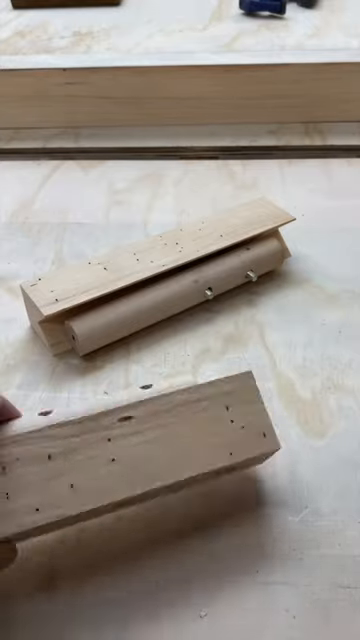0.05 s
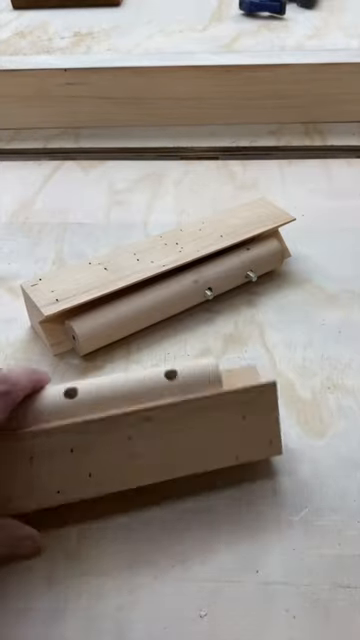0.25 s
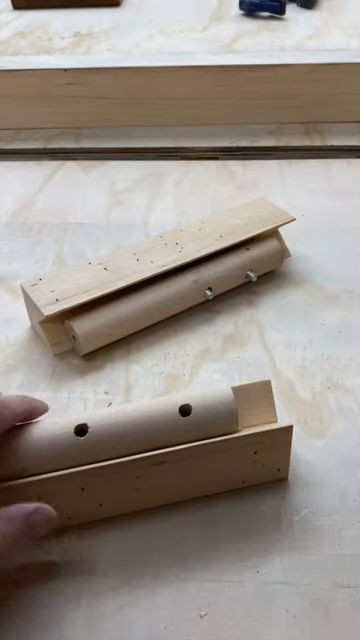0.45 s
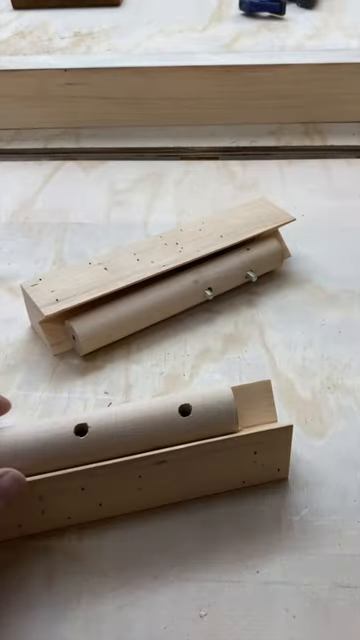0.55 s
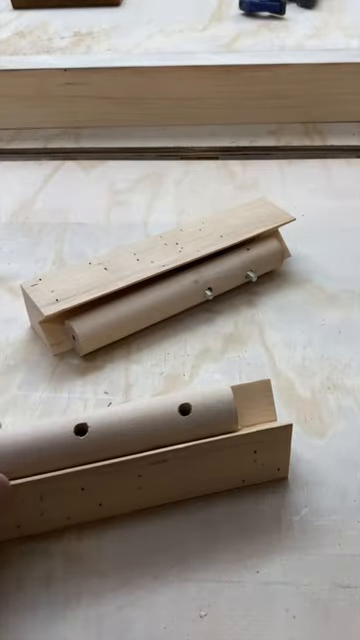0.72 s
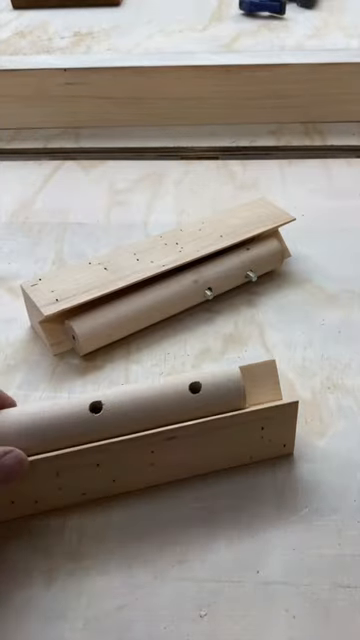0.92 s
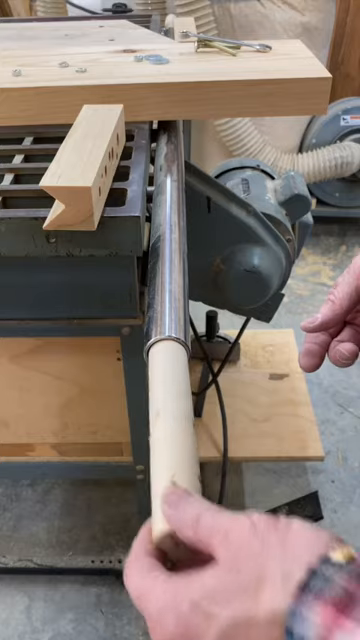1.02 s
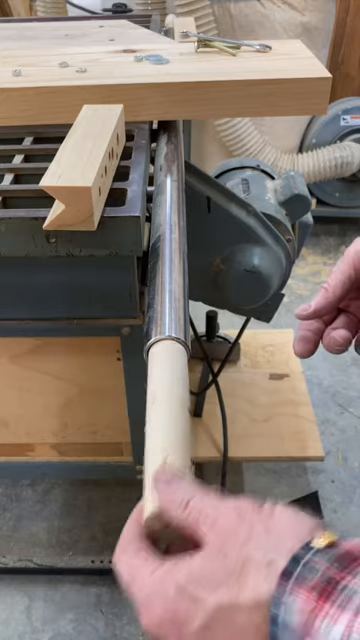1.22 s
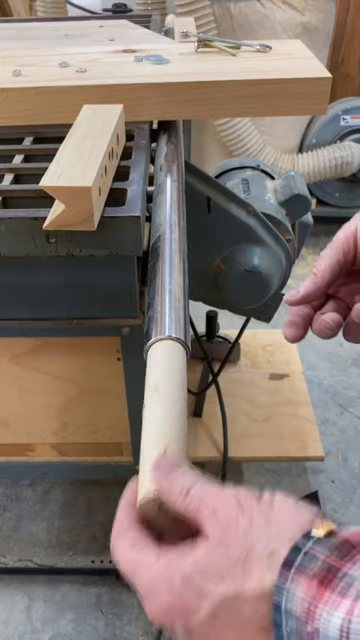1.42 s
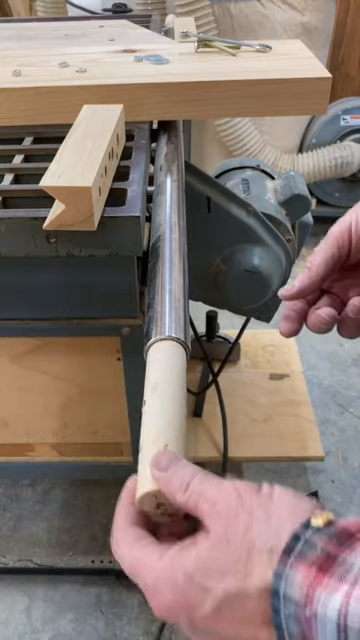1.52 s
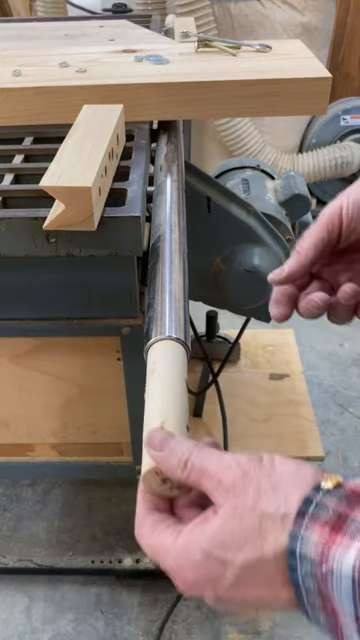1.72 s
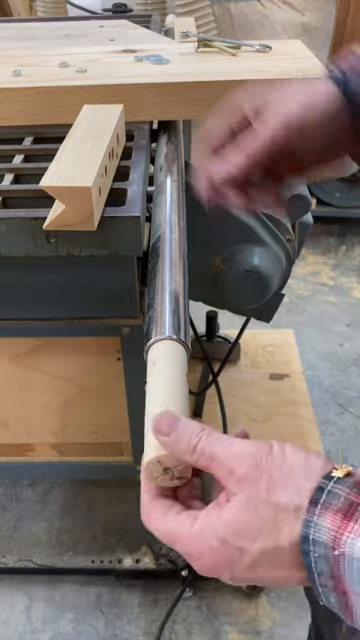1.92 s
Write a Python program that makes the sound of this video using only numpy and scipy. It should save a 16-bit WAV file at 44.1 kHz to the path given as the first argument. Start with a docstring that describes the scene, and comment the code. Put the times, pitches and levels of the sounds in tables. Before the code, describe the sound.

A wooden block clacks onto a workbench, then a dowel scrapes and taps into a tube.

```python
"""A small workshop, heard up close. Fingers brush a wooden block holding a dowel; it touches the
workbench, drops flat with a loud clack and is nudged along, shaking the bench. Then a dowel scrapes
into a steel tube on a machine stand, taps its wall and slides in. Each hit rings the wood or steel
and thumps the frame below; each rub is a stream of tiny slips over hiss, plus resonances kept
singing by friction. A short reverb and a quiet room tone sit behind it all."""
import sys
import numpy as np
from scipy import signal
from scipy.fft import rfft, irfft
from scipy.io import wavfile
from scipy.ndimage import uniform_filter1d, minimum_filter1d

SR = 44100
rng = np.random.default_rng(int(sys.argv[2]) if len(sys.argv) > 2 else 0)


def put_to_file(sound):
    """Save the sound as 16-bit audio at rate SR, in the file named by the first command-line argument."""
    columns = np.atleast_2d(sound).T  # one column per channel
    safe = np.clip(columns, -1, 1)
    whole_steps = np.round(safe * 32767)
    wavfile.write(sys.argv[1], SR, whole_steps.astype(np.int16))


N = 85995
T = np.arange(N) / SR
HZ = np.fft.rfftfreq(2 * N, 1 / SR)

# room tone EQ: f/Hz, level/dB
ROOM_TONE_EQ = [(30, -12.5), (70, 1), (130, -16), (300, -12.5), (1500, -23), (4500, -26), (6200, -23),
                (10500, -30.5), (13500, -65)]
# fingers and wood brushing the bench: t/s, length/s, level/dB, attack/s, release/s
STROKES = [(0.032, 0.0043, -56.5, 0.0011, 0.0041), (0.1, 0.16, -62, 0.037, 0.082),
           (0.219, 0.13, -48.5, 0.078, 0.052), (0.547, 0.19, -58.5, 0.019, 0.14),
           (0.718, 0.37, -59.5, 0.15, 0.13), (1.552, 0.064, -68, .015, 0.04)]
# brushing EQ: f/Hz, level/dB
BRUSH_EQ = [(100, -4.5), (500, -6.5), (1500, -17.5), (3000, -2.5), (4700, -10.5), (5900, -4.5), (8000, -3),
            (11000, -5.5), (14000, -59.5)]
# modes of the rubbed block: f/Hz, level/dB, t60/s
WOOD_RUB_MODES = [(2890, -2, 0.036), (4150, -6, 0.036), (5760, 4, 0.014), (7100, 0, 0.015),
                  (8500, -2, 0.007)]

# block hitting the bench: t/s, level/dB, low-pass/Hz, bench thump level/dB
KNOCKS = [(.2068, -13, 920, -41.5), (.3055, -12, 900, -45), (.3228, -20, 3020, -56.5),
          (.3257, 0, 2103, -26.5), (.3296, -10.5, 950, -36), (.3345, -16, 9920, -41.5),
          (.3372, -12.5, 6000, -35), (.3412, -9.5, 850, -29.5), (.3525, -18.5, 3800, -37.5),
          (.419, -24, 960, -55)]
# modes of block and bench top: f/Hz, level/dB, t60/s
WOOD_MODES = [(142.2, -8.5, 0.5), (197.7, -12.5, 0.46), (264.8, -11.5, 0.3), (333, 4, 0.2), (423, -10, .25),
              (516, -11, 0.2), (599, 0.5, 0.22), (708, -6.5, 0.19), (895, -12.5, 0.3), (937.4, -8.5, .2),
              (1558, -18.5, 0.3), (2380, -24, .25), (2550, -22, 0.11), (2875, -6.5, 0.22)]
# EQ of the wood's snap and dense ringing: f/Hz, level/dB
WOOD_EQ = [(50, -24), (150, -8.5), (350, -6), (700, -1.5), (1200, -10), (2500, -9.5), (3600, -7.5),
           (4700, -13.5), (6000, -11.5), (8500, -16.5), (11000, -22), (15000, -39.5)]
# decay of that ringing: f/Hz, t60/s
WOOD_DECAY = [(150, 0.34), (700, 0.12), (2500, 0.11), (6000, .04), (12000, 0.02)]
# modes of the bench frame: f/Hz, level/dB, t60/s
BENCH_MODES = [(54, -11, 0.83), (63, 8, 0.093), (92.8, -3, 1.3), (156.4, -4, 0.3)]
# bench shaken by the nudged block: t/s, level/dB
JUDDER_FADER = [(.5, -52), (.65, -46), (.75, -47), (.92, -60.5)]

# dowel dragging on the rim: t/s, level/dB
SCRAPE_FADER = [(.75, -58.5), (.82, -49), (.93, -49), (.975, -39), (1.008, -37.5), (1.045, -47.5),
                (1.1, -77), (1.2, -76), (1.25, -44.5), (1.42, -59), (1.54, -58.5), (1.66, -63),
                (1.78, -49.5), (1.88, -69)]
# scrape EQ: f/Hz, level/dB
SCRAPE_EQ = [(50, -15.5), (200, 3), (400, 1.5), (650, -4.5), (1100, -10), (2000, -16.5), (2800, -21),
             (4000, -31), (10000, -46.5), (13500, -82.5)]
# rim set ringing by the drag: t/s, level/dB
RIM_FADER = [(.9, -65), (.975, -67), (.99, -50), (1.03, -50), (1.06, -56.5), (1.085, -105), (1.65, -75),
             (1.69, -52.5), (1.76, -97)]
# modes of the rubbed rim: f/Hz, level/dB, t60/s
RIM_MODES = [(315, -10.5, .1), (1020, -1.5, 0.044), (2764, 5, 0.02), (3050, 0.5, 0.018), (6364, 0.5, 0.016)]
# dowel sliding inside the tube: t/s, level/dB
SLIDE_FADER = [(1.53, -83), (1.57, -67), (1.75, -67.5), (1.805, -47), (1.85, -45), (1.905, -48.5),
               (1.95, -61)]
# slide EQ: f/Hz, level/dB
SLIDE_EQ = [(280, -4.5), (700, -8.5), (1200, -3.5), (2000, 1), (3000, -7), (4200, -8.5), (6500, -9.5),
            (10200, -14.5), (13500, -67)]

# dowel hitting the tube: t/s, level/dB, low-pass/Hz, stand thump level/dB, tick level/dB,
# low ring f/Hz, low ring level/dB, hollow note f/Hz, hollow note level/dB
TAPS = [(1.003, -32.5, 300, -48, -23, 191, -13.5, 1109, -19),
        (1.2462, -31.5, 2180, -75, -31.5, 272, -6.5, 2177, -14),
        (1.2564, -41, 1540, -48, -40, 180, -17, 1883, -16.5),
        (1.3444, -40, 2300, -42, -15.5, 298.5, -15.5, 1640, -23.5),
        (1.4465, -43, 1700, -64, -21.5, 318.7, -19.5, 1034, -16),
        (1.4581, -34.5, 1370, -46.5, -51, 329.5, -21.5, 1114, -17),
        (1.628, -36, 1800, -65, -38, 187, -20.5, 1826, -28),
        (1.641, -32.5, 1290, -64, -42, 573, -36, 1087, -23)]
# modes of dowel and tube: f/Hz, level/dB, t60/s
TUBE_MODES = [(337.5, -7.5, 0.17), (597, -10, 0.46), (780, -8, 0.14), (1078.5, -1.5, 0.17),
              (1297, -19, 0.77), (1366, -23, 0.29), (1750, -5.5, 0.22), (1971, -3.5, 0.22)]
# EQ of the tube's snap and dense ringing: f/Hz, level/dB
TUBE_EQ = [(60, -2), (300, 2.5), (600, -3), (1100, -4.5), (2000, 9), (3000, 5), (4500, -7.5), (7000, -11),
           (11000, -14.5), (14500, -55)]
# decay of that ringing: f/Hz, t60/s
TUBE_DECAY = [(200, 0.11), (1000, 0.28), (2200, 0.075), (6000, 0.11)]
# modes of the machine stand: f/Hz, level/dB, t60/s
STAND_MODES = [(72.4, -1, 1.0), (112, -1.5, 0.35)]
# modes of the rim's edge: f/Hz, level/dB, t60/s
TICK_MODES = [(2480, -2, 0.0096), (2860, 0, 0.012), (1280, 5, 0.0066)]

# workshop reverb time: f/Hz, t60/s
ROOM_DECAY = [(80, 1), (300, .4), (1200, 0.55), (2700, 0.6), (5000, .35), (10000, 0.48)]
# stereo width of the mic pair: f/Hz, side level/dB
WIDTH = [(100, -30.5), (400, -9.5), (1000, -1.5), (1800, -12), (3500, -2), (7000, -14), (12000, 2)]
# lead of the left channel: f/Hz, phase/rad
LEFT_LEAD = [(300, 0), (850, -.35), (1300, -.25), (2000, .3), (2800, 1.5), (4500, 1.7), (6000, .8),
             (8000, 1.1), (11000, 2.8)]
# balance, left minus right: f/Hz, level/dB
BALANCE = [(200, 0), (500, 1.5), (780, 3.5), (1700, -0.5), (4200, -3), (5500, 0)]


def amp(db):
    """Decibels to gain."""
    return 10 ** (np.asarray(db) / 20)


def unit(x):
    """Normalises to an average energy of 1 per channel."""
    return x / np.sqrt(np.mean(np.sum(x ** 2, -1)) + 1e-20)


def curve_at(points, hz=HZ):
    """Reads a curve on a log-frequency axis."""
    f, value = np.transpose(points)
    return np.interp(np.log(hz + 1), np.log(f + 1), value)


def fader(points):
    """Gain ride: silent before the first point, held after the last."""
    return amp(np.interp(T, *np.transpose(points), left=-120))


def add(mix, t, sound):
    """Drops a sound into the mix at t seconds."""
    part = mix[:, round(t * SR):]
    part += sound[..., :part.shape[1]]


def butter(x, order, hz, kind="low"):
    """Butterworth low-, high- or band-pass."""
    return signal.sosfilt(signal.butter(order, hz, kind, fs=SR, output="sos"), x)


def equalise(x, eq):
    """Minimum-phase EQ, so nothing rings ahead of an attack."""
    cepstrum = irfft(np.log(amp(curve_at(eq))))
    cepstrum[1:N] *= 2
    cepstrum[N + 1:] = 0
    return irfft(rfft(x, 2 * N) * np.exp(rfft(cepstrum)))[..., :N]


def convolve(x, response):
    """Plays a stereo signal through an impulse response."""
    return signal.fftconvolve(x, np.atleast_2d(response), axes=1)[:, :N]


def ring(modes):
    """A struck object: decaying sines of alternating polarity."""
    return unit(sum((-1) ** k * amp(db - 60 * T / t60) * np.sin(2 * np.pi * hz * T)
                    for k, (hz, db, t60) in enumerate(modes)))


def tail(decay):
    """Dense stereo ringing, each band dying at its own speed."""
    size = 32768
    hz = np.fft.rfftfreq(size, 1 / SR)
    phases = np.exp(2j * np.pi * rng.random((2, len(hz))))
    centres, t60s = np.transpose(decay)
    out = np.zeros((2, N))
    for t60, solo in zip(t60s, np.eye(len(decay))):
        band = curve_at(list(zip(centres, solo)), hz)
        out[:, :size] += irfft(phases * band) * amp(-60 * T[:size] / t60)
    return unit(out)


def room_tone():
    """A steady bed of faint rumble and hiss."""
    return amp(-71) * np.sqrt(N) * unit(equalise(rng.standard_normal((2, N)), ROOM_TONE_EQ))


def friction(eq, slips_per_s, spread_db, hiss):
    """Tiny slips of uneven size over a smooth hiss, rms 1."""
    slips = (rng.random(N) < slips_per_s / SR) * rng.standard_normal(N)
    slips *= amp(spread_db * np.minimum(rng.exponential(1, N), 4))
    texture = unit(slips) + hiss * unit(rng.standard_normal((2, N)))
    return np.sqrt(N) * unit(equalise(texture, eq))


def rubbed(modes):
    """Resonances kept singing by friction, rms 1."""
    return np.sqrt(N) * unit(convolve(rng.standard_normal((2, N)), ring(modes)))


def hand_pressure(swell_db=3, fastest_hz=7.3):
    """Random swells of gain from an unsteady hand."""
    wander = irfft(rfft(rng.standard_normal(2 * N)) * (HZ < fastest_hz))[:N]
    return amp(swell_db * wander / wander.std())


def brushing():
    """Fingers and wood rub lightly on the bench; hiss and resonances swell separately."""
    strokes = sum(amp(db) * np.clip((T - t) / attack, 0, 1) * np.clip((t + length - T) / release, 0, 1)
                  for t, length, db, attack, release in STROKES)
    rustle = hand_pressure() * friction(BRUSH_EQ, slips_per_s=1800, spread_db=5.5, hiss=2.1)
    wood = amp(-2) * hand_pressure() * rubbed(WOOD_RUB_MODES)
    return strokes * (rustle + wood)


def impacts(hits, modes, eq, decay, frame, body_db, tail_db, snap_db, leak_db, contact_s, order):
    """Each hit layers body, snap and tail, dulled by a soft contact; the frame below thumps."""
    out = np.zeros((2, N))
    body, thump = amp(body_db) * ring(modes), amp(30.5) * ring(frame)
    contact = T * np.exp(-T / contact_s)
    crossover_hz = 3460  # the snap is a clean push below, a crunch above
    push = butter(signal.unit_impulse(N), 3, crossover_hz)
    for t, db, lowpass_hz, thump_db in hits:
        crunch = butter(unit(contact * rng.choice([-1, 1], N)), 3, crossover_hz, "high")
        snap = amp(snap_db) * unit(equalise(push + crunch, eq))
        ringing = amp(tail_db) * unit(equalise(tail(decay), eq))
        bright = body + snap + ringing
        dull = butter(bright, order, lowpass_hz)
        add(out, t, amp(db) * (dull + amp(leak_db) * bright) + amp(thump_db) * thump)
    return out


def block_drop():
    """The block lands on one edge, then clacks flat while the dowel rattles in it."""
    return impacts(KNOCKS, WOOD_MODES, WOOD_EQ, WOOD_DECAY, BENCH_MODES,
                   body_db=19, tail_db=22.5, snap_db=15, leak_db=-27, contact_s=0.0007, order=5)


def bench_judder():
    """The nudged block shakes a low rumble out of the bench frame."""
    return fader(JUDDER_FADER) * rubbed(BENCH_MODES)


def dowel_sliding():
    """The dowel scrapes past the rim, sets it singing, then slides home."""
    scrape = fader(SCRAPE_FADER) * friction(SCRAPE_EQ, slips_per_s=3400, spread_db=0, hiss=2.8)
    rim = fader(RIM_FADER) * rubbed(RIM_MODES)
    slide = fader(SLIDE_FADER) * friction(SLIDE_EQ, slips_per_s=6800, spread_db=-0.5, hiss=1.3)
    return scrape + rim + slide


def cluster(hz, spread, t60):
    """A mode between two weaker neighbours, which blur its pitch."""
    return ring([(hz * (1 + k * spread), -4 * abs(k), t60) for k in (0, 1, -1)])


def tube_taps():
    """Each tap on the tube wall ticks and brings out a low ring and a hollow note set by where it lands."""
    out = impacts([tap[:4] for tap in TAPS], TUBE_MODES, TUBE_EQ, TUBE_DECAY, STAND_MODES,
                  body_db=18, tail_db=28, snap_db=21, leak_db=-19.5, contact_s=0.0005, order=4)
    for t, _, _, _, tick_db, low_hz, low_db, hollow_hz, hollow_db in TAPS:
        tick = amp(tick_db) * ring(TICK_MODES)
        low = amp(low_db) * cluster(low_hz, spread=0.082, t60=0.36)
        hollow = amp(hollow_db) * cluster(hollow_hz, spread=0.04, t60=0.097)
        add(out, t, tick + low + hollow)
    return out


def workshop(x, send_db, predelay_s, band_hz):
    """Adds the room's reverb, thinner and duller than the direct sound."""
    response = np.zeros((2, N))
    add(response, predelay_s, butter(tail(ROOM_DECAY), 3, band_hz, "band"))
    return x + amp(send_db) * convolve(x, response)


def scene():
    """Bench and tube, each with its own reverb send, over the room tone."""
    bed = room_tone()
    bench = workshop(block_drop() + brushing(), send_db=-11, predelay_s=0.012, band_hz=(330, 7090))
    bench += bench_judder()
    tube = workshop(tube_taps() + dowel_sliding(), send_db=-5.5, predelay_s=0.005, band_hz=(157, 1916))
    return bed + bench + tube


def record(dry):
    """A close mic pair, near mono in the bass, into a low cut, a fast limiter and a steep high cut."""
    low_cut_hz, high_cut_hz, ceiling = 42, 15400, 0.89
    left, right = rfft(dry, 2 * N)
    mid = (left + right) / 2
    side = (left - right) / 2 * amp(curve_at(WIDTH))
    lean = amp(curve_at(BALANCE) / 2) * np.exp(0.5j * curve_at(LEFT_LEAD))  # half to each channel
    pair = irfft(np.array([(mid + side) * lean, (mid - side) / lean]))[:, :N]
    pair = butter(pair, 2, low_cut_hz, "high")
    safe_gain = np.minimum(1, ceiling / (abs(pair).max(0) + 1e-9))
    limited = pair * uniform_filter1d(minimum_filter1d(safe_gain, size=101), size=101)
    high_cut = signal.firwin(255, high_cut_hz, window=("kaiser", 9), fs=SR)
    return signal.oaconvolve(limited, high_cut[None], "same")


dry = scene()
out = record(dry)
put_to_file(out)
```